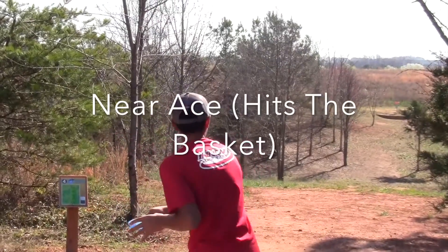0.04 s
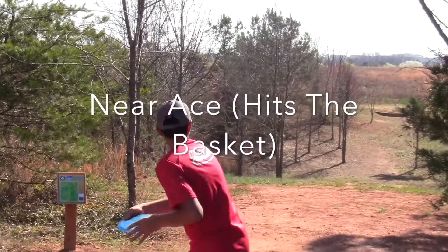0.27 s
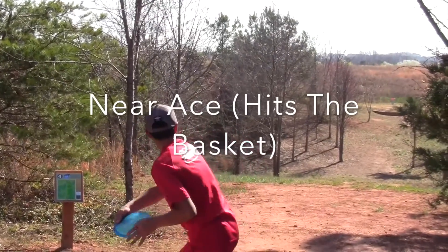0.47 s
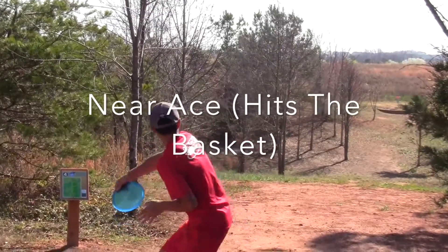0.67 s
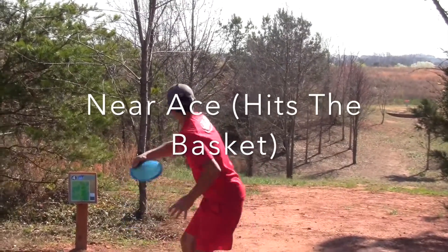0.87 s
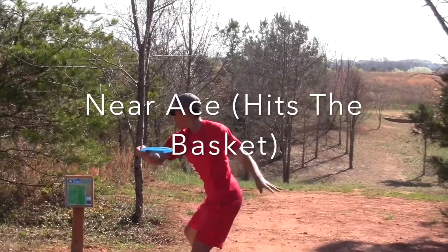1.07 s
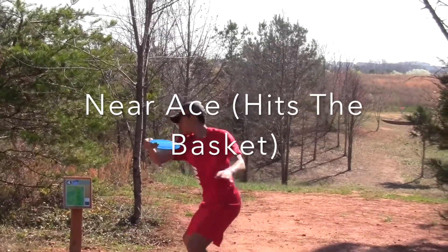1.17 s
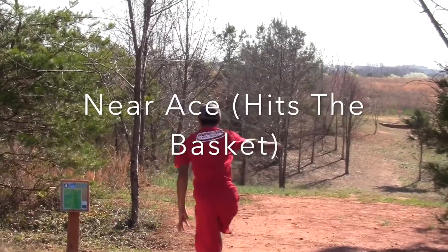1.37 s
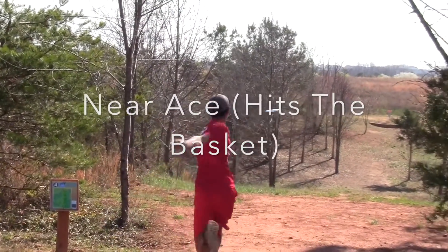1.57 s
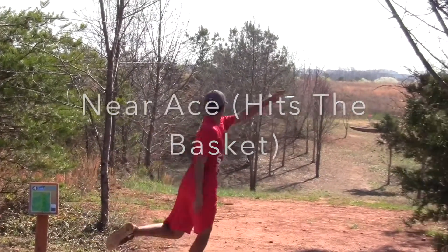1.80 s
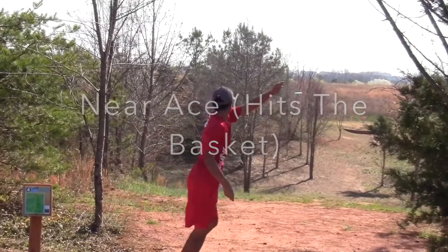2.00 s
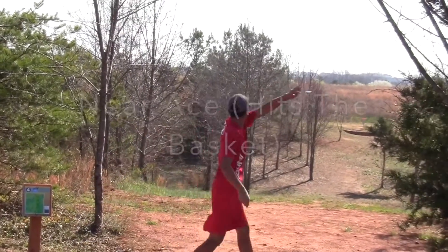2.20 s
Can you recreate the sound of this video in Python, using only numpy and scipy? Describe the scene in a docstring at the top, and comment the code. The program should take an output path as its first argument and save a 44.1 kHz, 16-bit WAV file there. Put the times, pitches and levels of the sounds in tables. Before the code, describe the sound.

A disc golf throw: gritty run-up steps and a sharp snap, with wind on the microphone.

```python
"""Shoes tap and scuff on gritty sand and clothes swish as a disc golfer runs up at the edge of a wood.
The disc snaps out of the fingers, making hand and disc ring briefly; a pivot and a last step follow.
The scuffs are many tiny grains colliding, and single grains crack underfoot. Swirling wind pushes
on the microphone and makes it rumble. Behind it all lie an open field and a faint, far chirping."""
import sys
import numpy as np
from scipy import signal
from scipy.fft import rfft, irfft
from scipy.io import wavfile
from scipy.ndimage import uniform_filter1d

SR = 44100
rng = np.random.default_rng(int(sys.argv[2]) if len(sys.argv) > 2 else 0)


def file_out(sig):
    """Save sig as 16-bit WAV at sys.argv[1]."""
    # one column per channel
    cols = np.atleast_2d(sig).T
    # limit, then scale
    lim = np.clip(cols, -1, 1)
    pcm = np.round(lim * 32767).astype(np.int16)
    wavfile.write(sys.argv[1], SR, pcm)


N = 99225
TIME = np.arange(N) / SR
FREQS = np.maximum(np.fft.rfftfreq(N, 1 / SR), 1)

# Levels in a table compare its rows; the functions may turn the whole layer up or down.
# The disc's rim slaps off the fingers: start_s, low_ring_db, high_ring_db, left_minus_right_db
RIM_SLAPS = [(1.4629, -14, -9, 5), (1.4642, -20, -12.5, -3)]
# The tones that hand and disc ring with: pitch_hz, level_db, ring_s (time to fade by 60 dB)
DISC_TONES = [(232, -16.5, 0.028), (786, -10, 0.014), (1000, -10, 0.012), (1360, -6, 0.0094),
              (1600, -5, 0.0069), (1950, -11.5, 0.0037), (4500, -2, 0.0022), (5500, 2.5, 0.0017),
              (6660, 2.5, .0014), (8220, -1.5, 0.0029)]
# Shoes knock on the ground: start_s, level_db, pitch_hz, half_width_octaves, click_vs_knock_db
FOOTFALLS = [(0.624, -34, 434, .55, -28), (0.7741, -36, 1760, 0.23, -7), (1.0, -36.5, 1660, 0.24, -2),
             (1.267, -36.5, 885, 0.5, -15), (1.415, -36, 950, 0.34, -4), (1.839, -25.5, 1280, 0.45, -31)]
# Soles and clothes slide: start_s, rise_s, hold_s, fall_s, hiss_db, rub_db
SLIDES = [(0.013, 0.016, 0.11, 0.032, -63, -58), (0.118, 0.023, 0.0182, 0.027, -50.5, -55),
          (0.391, 0.0087, 0.047, 0.042, -59, -74), (0.6, 0.068, 0.018, 0.013, -48.5, -49),
          (0.914, 0.029, 0.016, 0.014, -48, -51.5), (0.989, 0.011, 0.0355, 0.013, -51.5, -56),
          (1.056, .02, 0.018, .02, -58, -71), (1.153, 0.0112, 0.051, 0.029, -59.5, -78),
          (1.256, 0.019, .008, 0.01, -50.5, -46.5), (1.278, 0.017, 0.0099, 0.014, -48, -46),
          (1.315, .004, 0.0047, 0.017, -39.5, -50.5), (1.325, 0.019, 0.017, 0.011, -39, -44.5),
          (1.353, .008, 0.019, 0.014, -51, -41), (1.371, 0.012, 0.013, 0.011, -43.5, -48.5),
          (1.395, 0.013, 0.021, 0.022, -46, -52), (1.435, 0.0074, 0.0095, 0.0094, -39, -42.5),
          (1.448, 0.0024, 0.0048, 0.0045, -50, -28.5), (1.458, 0.004, 0.011, 0.036, -37.5, -36),
          (1.476, 0.02, 0.046, 0.024, -42.5, -45), (1.53, 0.016, 0.015, 0.018, -49, -59),
          (1.584, 0.058, 0.092, 0.045, -57.5, -56), (1.735, 0.011, 0.012, 0.048, -49.5, -49.5),
          (1.772, 0.016, 0.09, 0.089, -48.5, -53.5), (1.833, 0.0067, 0.011, 0.022, -53, -45.5),
          (1.897, 0.016, 0.28, 0.08, -61.5, -65)]
# The bright hiss of a slide: pitch_hz, level_db
HISS_SPECTRUM = [(500, -5.5), (1500, -13.5), (2500, -1), (3300, -2.5), (4400, -0.5), (5300, -6),
                 (6600, -1.5), (8200, -0.5), (9800, -6.5), (11000, -19), (12000, -28), (13000, -22),
                 (15000, -63)]
# The dull rub of a slide: pitch_hz, level_db
RUB_SPECTRUM = [(150, -2), (300, 1.5), (480, -16.5), (780, 3), (1200, -2), (1500, -3), (1900, 0),
                (2500, -15.5), (4000, -13), (9000, -22), (15000, -67)]
# The sizzle, the very highest part of the hiss: pitch_hz, level_db
SIZZLE_SPECTRUM = [(4000, -30), (7500, 0), (9500, 8.5), (11000, -2.5), (12000, -13), (13000, -8),
                   (15000, -53)]
# How much sizzle the hiss has as time passes: time_s, level_db
SIZZLE_LEVELS = [(0, -11.5), (1.2, -14), (1.45, -10), (1.65, -8.5), (1.76, -0.5), (1.9, -8.5), (2.25, -5.5)]
# Single grains of grit crack underfoot: start_s, level_db, pitch_hz
GRIT_CRACKS = [(0.061, -44, 3000), (.078, -43, 2730), (.094, -53, 3200), (0.1463, -28.5, 6300),
               (0.201, -38.5, 7000), (.291, -44, 7100), (0.34, -44.5, 5960), (0.402, -40.5, 6500),
               (0.41, -50.5, 6000), (.431, -40, 5830), (.445, -35, 5700), (.595, -42, 7500),
               (0.61, -44, 3000), (0.65, -33, 7500), (0.658, -30, 7300), (.661, -37.5, 4000),
               (.672, -35, 8000), (0.901, -37.5, 8000), (1.036, -28.5, 5900), (1.093, -41.5, 4940),
               (1.164, -43, 6050), (1.186, -39.5, 8000), (1.259, -35, 8100), (1.3195, -26.5, 4900),
               (1.343, -31, 7950), (1.353, -24, 8500), (1.363, -29, 6000), (1.4162, -20.5, 8200),
               (1.516, -24.5, 8650), (1.739, -30.5, 9000), (1.751, -23.5, 9800), (1.761, -27, 9500),
               (1.798, -26, 9350), (1.8946, -33.5, 8100), (2.112, -35.5, 8600), (2.185, -33.5, 8000)]
# The shirt rustles as the body turns: middle_s, level_db, half_width_s
SHIRT_RUSTLES = [(.11, -64, 0.091), (.66, -62, .03), (1.64, -70.5, 0.018)]
# The strength of the wind on the microphone: time_s, level_db
WIND_LEVELS = [(0, -48), (.17, -49.5), (.23, -32), (.3, -41), (.38, -30), (.47, -27.5), (.56, -37.5),
               (.7, -35), (.78, -39.5), (.9, -44), (.97, -30.5), (1.19, -38), (1.29, -43.5), (1.42, -41),
               (1.55, -41), (1.72, -38), (1.85, -36.5), (2.25, -46)]
# Small swirls of air hit the microphone: middle_s, level_db, half_width_s
WIND_SWIRLS = [(0.242, -28, 0.0053), (.365, -29.5, .01), (.453, -22, 0.0083), (.5, -31, 0.0055),
               (0.664, -31, 0.022), (0.828, -24.5, 0.011), (1.006, -21.5, 0.0086), (1.108, -29, 0.034),
               (1.211, -32, 0.024), (1.397, -34, 0.011), (1.48, -30, 0.021), (1.582, -34, 0.01),
               (1.672, -28, 0.019), (1.728, -26, 0.016), (1.915, -33.5, 0.026), (1.985, -36.5, 0.013),
               (2.125, -37.5, 0.017)]
# The wind's deep rumble: pitch_hz, level_db
RUMBLE_SPECTRUM = [(15, -14), (25, -8.5), (48, 3), (85, 2.5), (130, -3.5), (160, -9), (200, -17),
                   (330, -31), (500, -66), (1500, -59), (4000, -82)]
# The higher rumble of strong gusts: pitch_hz, level_db
GUST_SPECTRUM = [(60, -41), (140, -10), (200, -18), (260, 8), (350, -4), (600, -50), (2000, -66)]
# The wind shifts round the microphone: time_s, left_minus_right_db
WIND_BALANCE = [(0, -3), (.83, -3), (.95, -1.65), (2.25, -4.5)]
# Faint, far chirps: middle_s, level_db
FAR_CHIRPS = [(.015, -58), (.079, -57), (0.13, -51.5), (0.197, -53.5), (0.231, -51.5), (.283, -54),
              (0.344, -52), (0.434, -53.5), (0.467, -53), (.496, -50.5), (0.584, -55), (0.616, -47),
              (.733, -52.5), (0.799, -54), (0.832, -54), (0.878, -49.5), (1.181, -54), (1.214, -53.5),
              (1.249, -53), (1.642, -49), (1.696, -55), (2.079, -51), (2.15, -56), (2.182, -53),
              (2.23, -55)]
# Distant air, the part both ears share: pitch_hz, level_db
AIR_SPECTRUM = [(30, 1), (150, 0.5), (300, -3), (500, -3), (800, -6), (1200, -14), (1800, -16.5),
                (2500, -23.5), (4000, -27), (7000, -32.5), (10000, -34), (12000, -39), (15000, -46)]
# Distant air, the part that differs between the ears: pitch_hz, level_db
AIR_SIDE_SPECTRUM = [(30, 0.5), (150, 2), (300, -6), (500, -5.5), (1000, -14), (2000, -20), (4000, -31.5),
                     (8000, -38), (12000, -31.5), (15000, -38)]

GRAINS_PER_S = 2500


def disc_snap():
    """Two quick slaps ring the hand and disc, which fall quiet fast; only high tones lean to a side."""
    out = np.zeros((2, N))
    for start_s, low_db, high_db, pan_db in RIM_SLAPS:
        high_stereo_db = high_db + pan_db * np.array([[.5], [-.5]])
        for k, (hz, db, ring_s) in enumerate(DISC_TONES):
            strength = from_db(db + (low_db if hz < 3000 else high_stereo_db))
            ring = fade(start_s, ring_s / np.log(1000)) * np.sin(2 * np.pi * hz * (TIME - start_s))
            out += (-1) ** k * strength * ring  # every other tone starts the opposite way
    return low_pass(out, hz=9800)


def footsteps():
    """A sole lands with a short knock and a gritty click; the sand settles under it."""
    out = np.zeros(N)
    for start_s, db, hz, octaves, click_db in FOOTFALLS:
        knock = band(signal.unit_impulse(N, int(start_s * SR)), hz, octaves)
        click = band(rng.standard_normal(N) * fade(start_s, decay_s=.0012), hz=3650, octaves=.15)
        sand = unit_power(band(rng.standard_normal(N), hz, octaves)) * fade(start_s, decay_s=.024)
        step = unit_peak(knock) + from_db(click_db) * unit_peak(click) + from_db(-22.5) * sand
        out += from_db(db) * step
    return out


def swishes():
    """Sliding soles and clothes make a dull rub and a bright hiss, both full of tiny grains."""
    hiss_power, rub_power = 0, 0
    for start_s, rise_s, hold_s, fall_s, hiss_db, rub_db in SLIDES:
        t = TIME - start_s
        shape = np.clip(t / rise_s, 0, 1) * np.exp(-np.maximum(t - rise_s - hold_s, 0) / fall_s)
        hiss_power += (from_db(hiss_db) * shape) ** 2
        rub_power += (from_db(rub_db) * shape) ** 2
    hiss = from_db(-7) * grains(HISS_SPECTRUM, GRAINS_PER_S)
    hiss = hiss + from_db(-7.5) * wide_noise(HISS_SPECTRUM, side_db=-67)
    rub = from_db(-7.5) * grains(RUB_SPECTRUM, per_s=700)
    rub = rub + from_db(-4) * wide_noise(RUB_SPECTRUM, side_db=-49)
    hiss += from_db(over_time(SIZZLE_LEVELS)) * wide_noise(SIZZLE_SPECTRUM, side_db=-16)
    rub *= from_db(wander(rate_hz=69))  # the rub wavers by about 1 dB
    flutter = from_db(2 * wander(rate_hz=38))
    return flutter * (np.sqrt(hiss_power) * hiss + np.sqrt(rub_power) * rub)


def grit(crack_decay_s=.00078):
    """Grains give way underfoot in very short, bright cracks, each trailing off in crumbs."""
    cracks, crumb_level = np.zeros(N), np.zeros(N)
    t = TIME[:SR // 50]
    for start_s, db, hz in GRIT_CRACKS:
        burst = rng.standard_normal(len(t)) * np.exp(-t / crack_decay_s)
        crack = unit_peak(band(burst, hz, octaves=.54))
        add(cracks, start_s, from_db(db - 2.5) * crack)
        crumb_level += from_db(db - 22.5) * fade(start_s, decay_s=.0086)
    return low_pass(cracks, hz=10470) + crumb_level * grains(HISS_SPECTRUM, GRAINS_PER_S)


def shirt():
    """Fabric brushes on fabric and makes a soft rustle."""
    level = sum(from_db(db) * swell(middle_s, width_s) for middle_s, db, width_s in SHIRT_RUSTLES)
    rustle = band(grains(HISS_SPECTRUM, GRAINS_PER_S), hz=2110, octaves=.38)
    return level * unit_power(rustle)


def wind():
    """Churning air rumbles on the microphone, swelling as each swirl hits."""
    power = from_db(over_time(WIND_LEVELS)) ** 2
    for middle_s, db, half_width_s in WIND_SWIRLS:
        power += from_db(db) ** 2 * swell(middle_s, half_width_s)
    level = np.sqrt(power)
    rumble = noise(RUMBLE_SPECTRUM)
    local_power = uniform_filter1d(uniform_filter1d(rumble ** 2, size=700), size=500)
    rumble = unit_power(rumble / np.sqrt(local_power))  # even out the noise's own swells
    gust_strength = (level / from_db(-30)) ** .31  # stronger gusts sound a little brighter
    rumble += from_db(-28) * gust_strength * noise(GUST_SPECTRUM)
    separate_rumbles = from_db(-8.5) * np.array([noise(RUMBLE_SPECTRUM), noise(RUMBLE_SPECTRUM)])
    pressure = opposite_push(over_time(WIND_BALANCE)) * (rumble + separate_rumbles)
    return from_db(-.5) * level * pressure


def whirl(middle_s=.4345, half_width_s=.0034, flutter_hz=202):
    """One strong whirl of air pushes, then sucks at the microphone, shedding a short flutter."""
    t = TIME - middle_s
    thump = -t / half_width_s * np.exp((1 - (t / half_width_s) ** 2) / 2)
    flutter = np.sin(2 * np.pi * flutter_hz * t) * swell(middle_s, half_width_s=.0092)
    return opposite_push(pan_db=-3.5) * (from_db(-10) * thump + from_db(-18.5) * flutter)


def chirps(pitch_hz=1746, upper_hz=2854, fall_hz_per_s=10000, width_s=.0028):
    """Far chirps, perhaps frogs: each is a short, rough, falling tone with a weaker one above it."""
    out = np.zeros(N)
    t = np.arange(-.02, .02, 1 / SR)
    shape = np.exp(-(t / width_s) ** 2 / 2)
    for middle_s, db in FAR_CHIRPS:
        hz = pitch_hz * (1 + .013 * rng.standard_normal())
        falling = np.sin(2 * np.pi * (hz - fall_hz_per_s * t / 2) * t)
        upper = from_db(-14) * np.sin(2 * np.pi * upper_hz * t)
        add(out, middle_s + t[0], from_db(db) * shape * (falling + upper))
    roughness = 1 + .33 * wander(rate_hz=600)
    return out * roughness


def field_air():
    """Distant air over the open field makes a soft, steady hush."""
    shared = noise(AIR_SPECTRUM)
    side = from_db(-4.5) * noise(AIR_SIDE_SPECTRUM) * [[1], [-1]]
    return from_db(-51.5) * (shared + side)


def with_echo(x, ring_s=.065):
    """Sound bounces off the ground and trees, which adds a short, thin tail."""
    tail = rng.standard_normal(N) + from_db(-34) * rng.standard_normal((2, N))
    tail *= fade(start_s=.00066, decay_s=ring_s / np.log(1000))
    tail /= np.sqrt(np.sum(tail ** 2, axis=1, keepdims=True))
    echo = signal.fftconvolve(np.atleast_2d(x), tail, axes=1)[:, :N]
    return x + from_db(-12.5) * echo


def opposite_push(pan_db):
    """Wind pushes the left and right channels opposite ways, one harder than the other."""
    return np.array([from_db(pan_db / 2), -from_db(-pan_db / 2)]).reshape(2, -1)


def grains(spectrum, per_s, spread_db=7):
    """Tiny collisions of uneven size at random moments."""
    sizes = from_db(spread_db * np.minimum(rng.exponential(1, N), 3))
    signs = rng.choice([-1, 1], N)
    hits = rng.random(N) < per_s / SR
    return colour(sizes * signs * hits, spectrum)


def colour(x, spectrum):
    """Make each pitch as strong as the spectrum says, then set the power to 1."""
    hz, db = np.transpose(spectrum)
    gains = from_db(np.interp(np.log(FREQS), np.log(hz), db))
    return unit_power(irfft(rfft(x) * gains, N))


def noise(spectrum):
    """Noise with a given mix of low and high pitches."""
    return colour(rng.standard_normal(N), spectrum)


def wide_noise(spectrum, side_db):
    """Stereo noise, mostly the same in both ears."""
    return noise(spectrum) + from_db(side_db) * noise(spectrum) * [[1], [-1]]


def wander(rate_hz):
    """A random wobble about 1 in size, mostly slower than rate_hz."""
    return unit_power(irfft(rfft(rng.standard_normal(N)) / (1 + (FREQS / rate_hz) ** 2), N))


def fade(start_s, decay_s):
    """A level that jumps to 1, then dies away."""
    return (TIME >= start_s) * np.exp(-np.clip((TIME - start_s) / decay_s, 0, 60))


def swell(middle_s, half_width_s):
    """A level that rises smoothly to 1 and falls again."""
    return np.exp(-((TIME - middle_s) / half_width_s) ** 2)


def over_time(points):
    """Join (time, value) points with straight lines."""
    return np.interp(TIME, *np.transpose(points))


def band(x, hz, octaves):
    """Keep the pitches within so many octaves either side of hz."""
    edges = np.clip(hz * 2 ** (np.array([-1, 1]) * octaves), 20, SR * .45)
    return signal.sosfilt(signal.butter(2, edges, "band", fs=SR, output="sos"), x + 1e-18)


def low_pass(x, hz):
    """Keep the pitches below hz."""
    return signal.sosfilt(signal.butter(6, hz, fs=SR, output="sos"), x + 1e-18)


def add(out, start_s, sound):
    """Mix a short sound in at a given time."""
    start = int(np.clip(start_s * SR, 0, N - 1))
    out[start:start + len(sound)] += sound[:N - start]


def from_db(db):
    """Turn decibels into a number to multiply by."""
    return 10 ** (np.asarray(db) / 20)


def unit_power(x):
    """Scale so the average power is 1."""
    return x / np.sqrt(np.mean(x ** 2) + 1e-20)


def unit_peak(x):
    """Scale so the biggest swing is 1."""
    return x / abs(x).max()


def scene():
    """The thrower in front, wind and field all round."""
    thrower = with_echo(disc_snap() + footsteps()) + swishes() + shirt() + grit()
    return thrower + wind() + whirl() + with_echo(chirps()) + field_air()


def record(dry):
    """The recorder cuts off the very highest pitches."""
    cutoff_hz = 15750
    return signal.sosfilt(signal.ellip(10, .1, 70, cutoff_hz, fs=SR, output="sos"), dry)


dry = scene()
out = record(dry)
file_out(out)
```